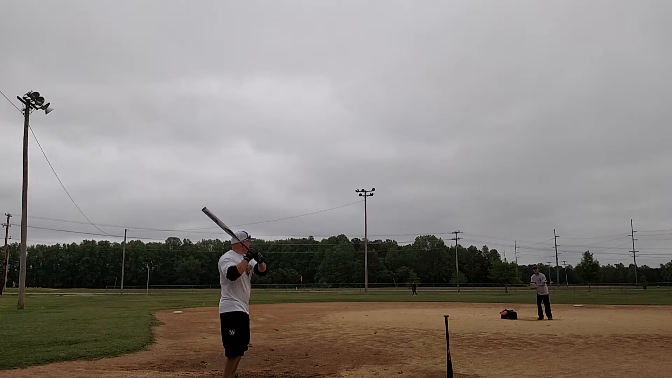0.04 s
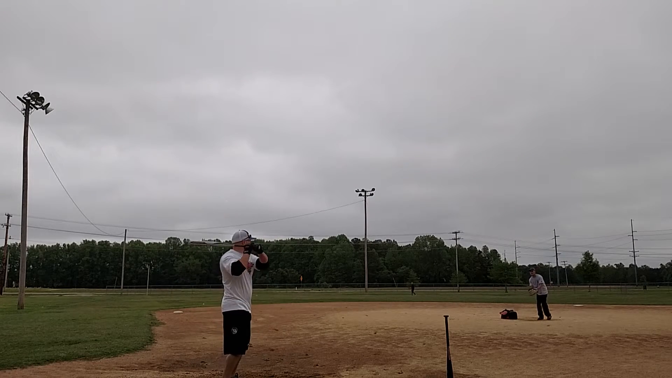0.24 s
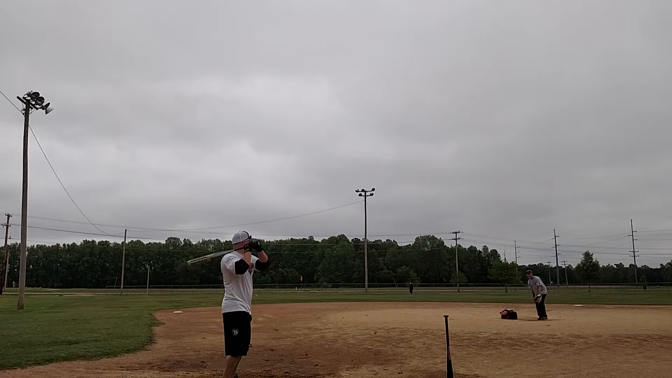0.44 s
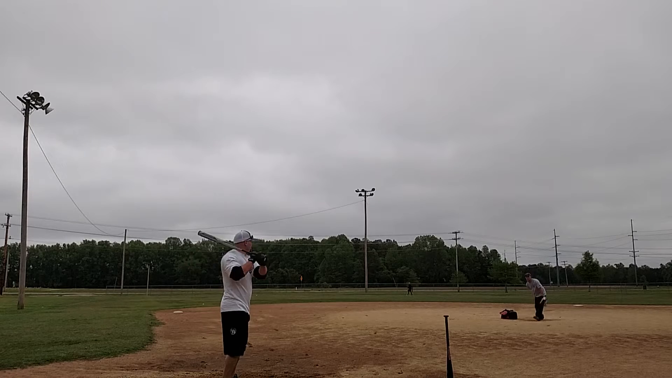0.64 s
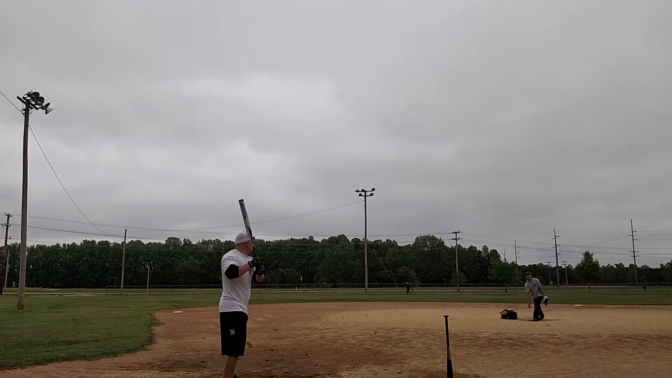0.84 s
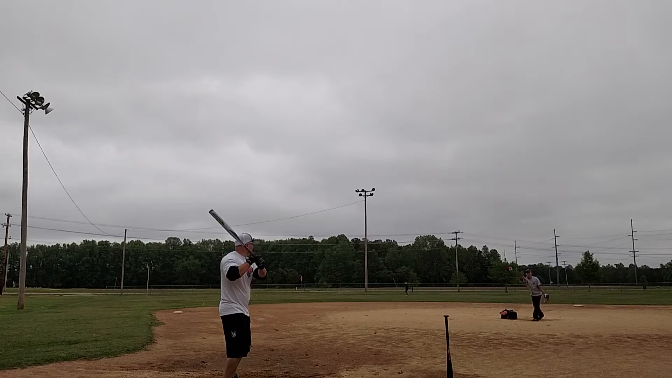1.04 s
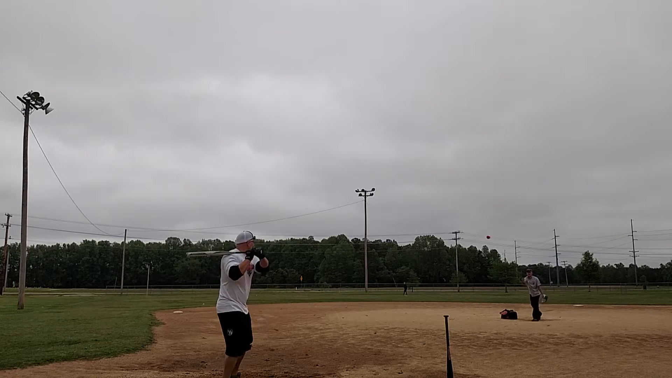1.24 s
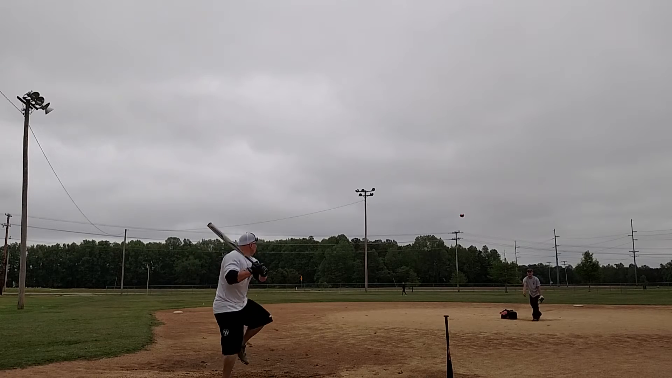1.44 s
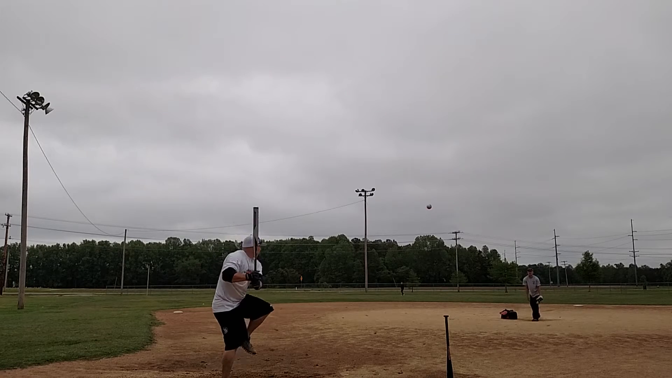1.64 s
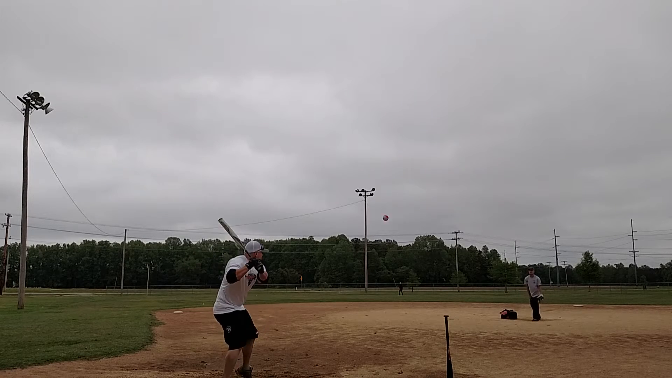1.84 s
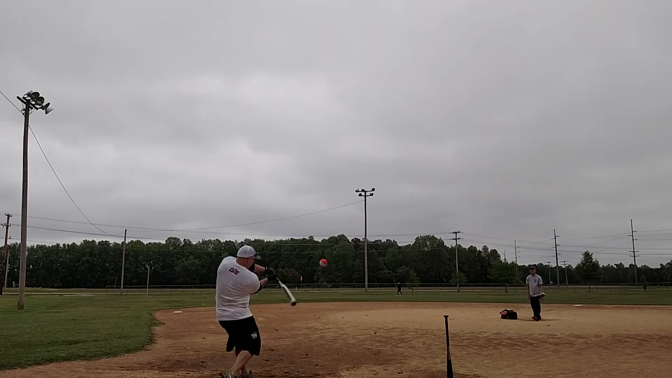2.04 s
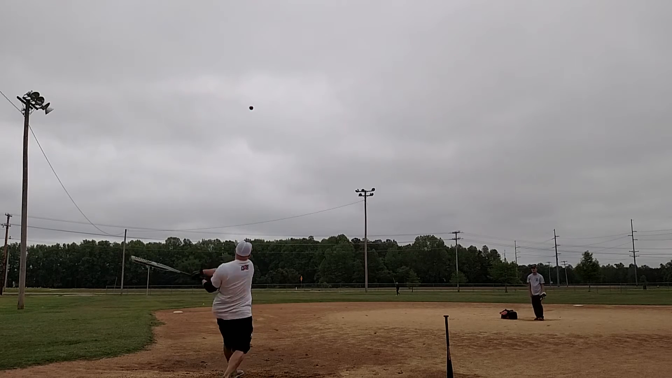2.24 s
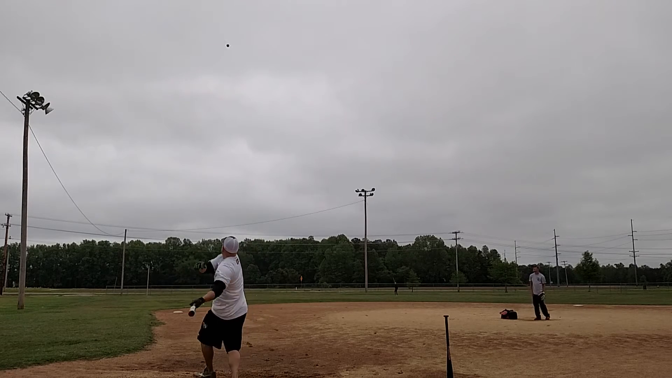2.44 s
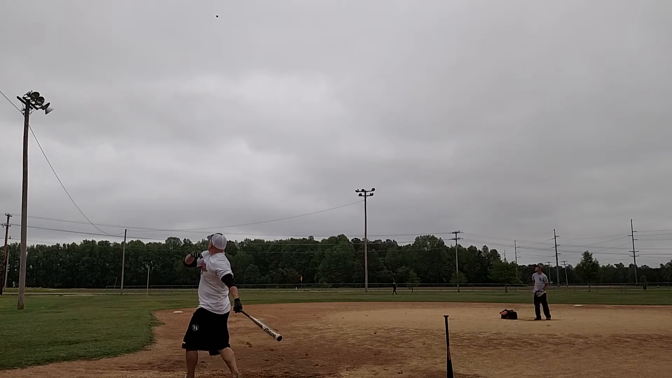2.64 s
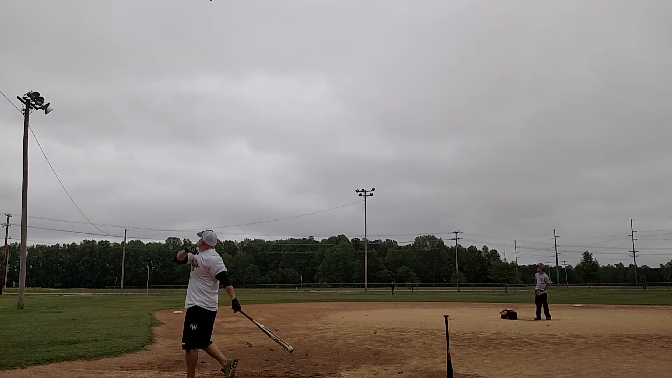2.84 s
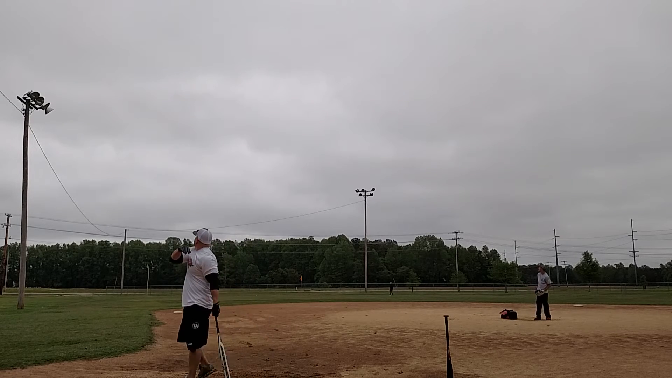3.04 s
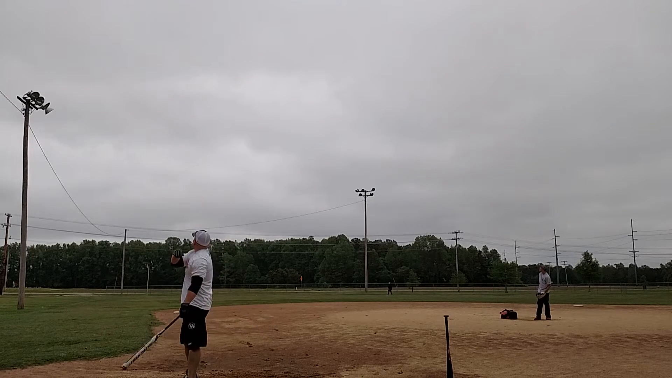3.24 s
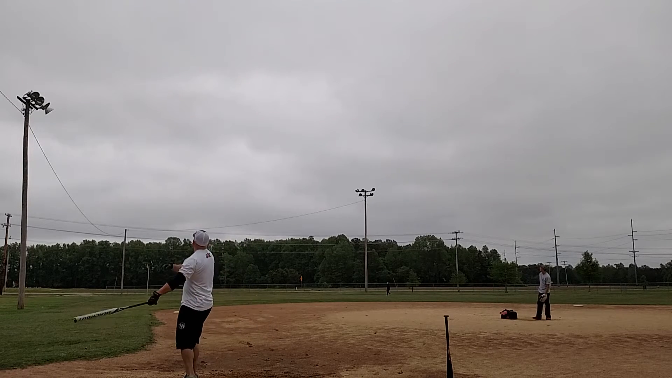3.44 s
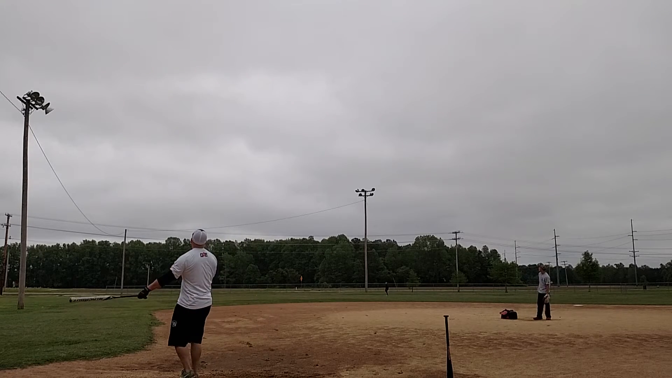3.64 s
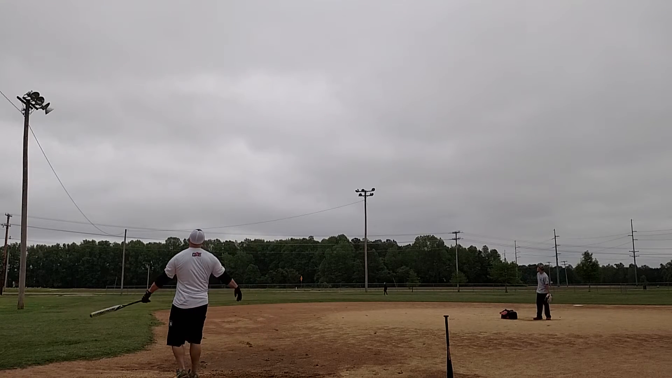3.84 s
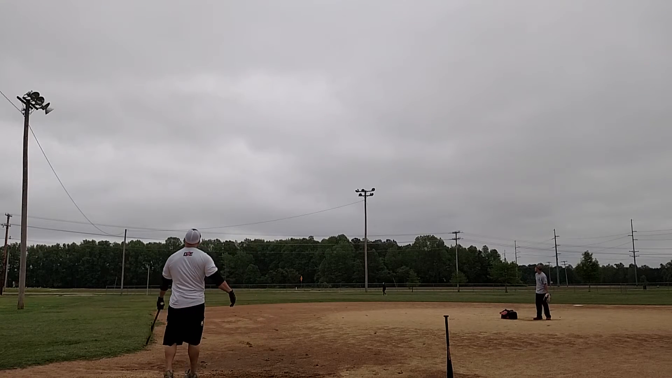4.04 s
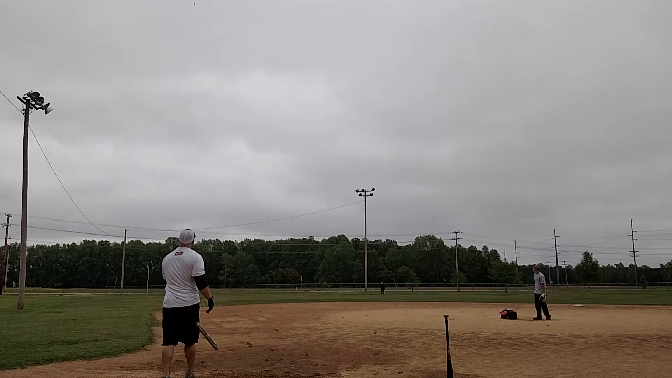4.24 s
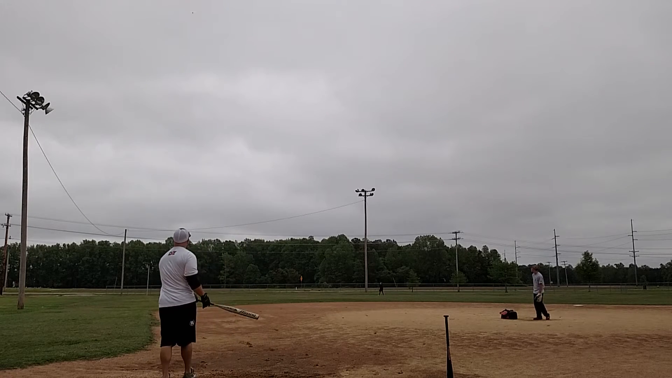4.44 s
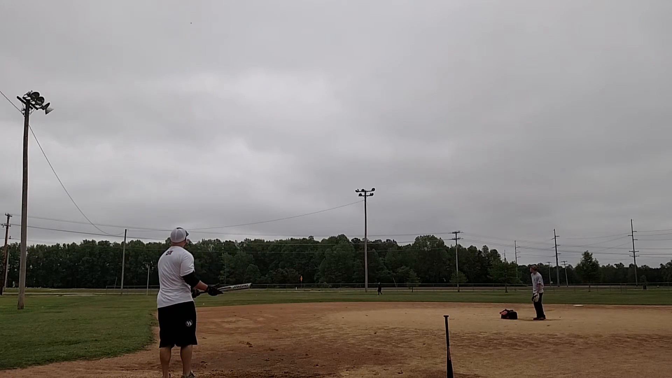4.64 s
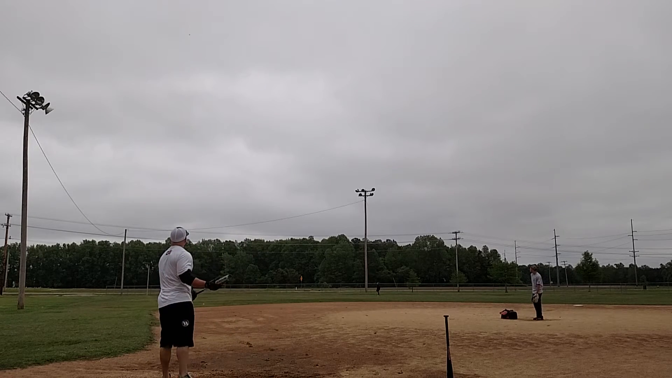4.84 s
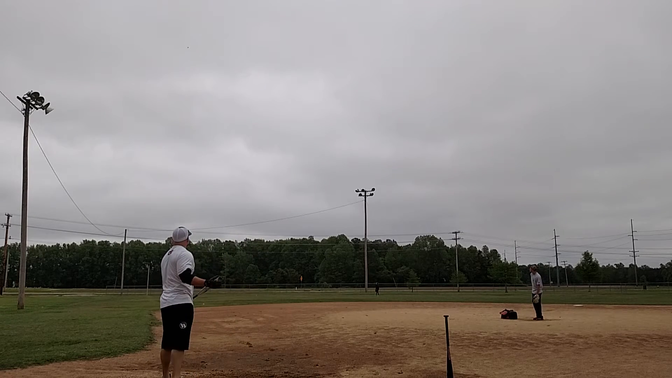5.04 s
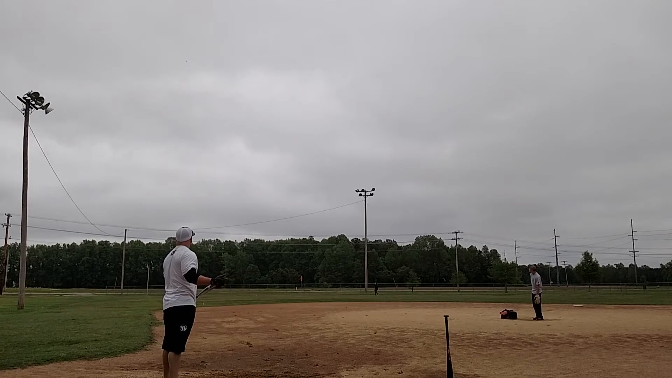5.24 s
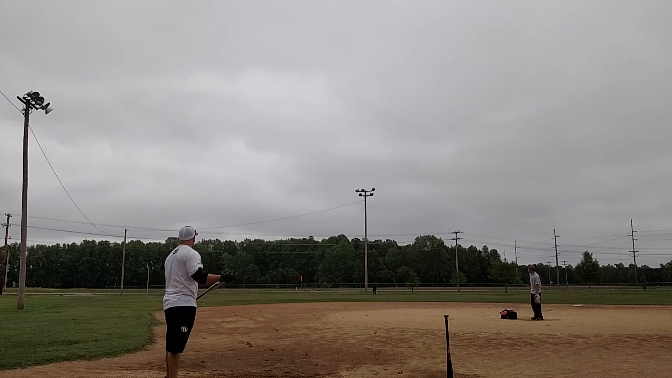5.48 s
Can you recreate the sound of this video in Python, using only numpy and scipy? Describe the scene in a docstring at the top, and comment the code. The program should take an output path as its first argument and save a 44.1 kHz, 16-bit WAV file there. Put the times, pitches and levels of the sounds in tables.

```python
"""An open dirt infield, the microphone a few steps from a batter who drives one pitched softball.
His shoes grind the dirt, the bat whooshes and cracks, and the ground, fences and a tree line answer.
Songbirds whistle and an insect buzzes over far traffic and leaves; a light breeze touches the microphone.
The crack overloads the recorder, whose gain dives and creeps back."""
import sys
import numpy as np
from scipy import signal
from scipy.fft import rfft, irfft
from scipy.io import wavfile

SR = 44100
rng = np.random.default_rng(int(sys.argv[2]) if len(sys.argv) > 2 else 0)


def to_wav(s):
    """Save 16-bit WAV."""
    ch = np.atleast_2d(s).T  # columns
    pcm = np.round(np.clip(ch, -1, 1) * 32767)  # PCM
    wavfile.write(sys.argv[1], SR, pcm.astype(np.int16))


N = 242991
TIME = np.arange(N) / SR
HIT_S = 2.2261

# Far traffic and leaves. Each row: frequency in Hz, relative level in dB.
TRAFFIC_SPECTRUM = [(12, -34), (20, -1.5), (44, -13), (109, 2.5), (232, 2.5), (393, -8.5), (439, -10),
                    (788, -16), (2150, -20.5), (2680, -21.5), (3170, -25.5), (6020, -34), (13900, -43.5),
                    (15500, -45.5)]
# Gusts on the microphone. Each row: centre in seconds, half width in seconds, level in dB.
GUSTS = [(.24, .05, -53), (.92, .18, -55), (1.98, .35, -53.5)]
# The birds' repertoire. Each entry: length in seconds, first, middle and last pitch in Hz, buzz from 0 to 1.
SYLLABLES = {"fall": (.112, 5800, 4480, 3550, .3), "rise": (.03, 1990, 2220, 2500, .1),
             "dip": (.03, 2010, 1790, 1590, 0.092), "flick": (.03, 3300, 2760, 2620, .1),
             "slur": (.048, 2920, 2810, 2100, .05), "arch": (0.14, 2480, 2735, 2680, .1),
             "coo": (.075, 1850, 2000, 2120, .08), "pip": (.04, 2700, 2700, 2700, .15),
             "hook": (.065, 4700, 5200, 5200, .25), "lisp": (.065, 6950, 6800, 6720, .55)}
# A bird repeats one syllable at an even pace.
# Each row: syllable, start, end and interval in seconds, first and last relative level in dB.
BOUTS = [("fall", .178, 1.4, .538, -68, -63), ("dip", .061, .7, .281, -63.5, -59.5),
         ("rise", .392, 1.2, .144, -62, -63), ("flick", .412, 1.05, .145, -70, -67),
         ("slur", 1.262, 2, .16, -61, -61.5), ("arch", 1.364, 1.9, .35, -63, -61),
         ("coo", 1.07, 1.7, .53, -70, -68), ("flick", 4.69, 5, .225, -66.5, -66.5),
         ("flick", 5.335, 5.5, .11, -65.5, -66)]
# Lone calls. Each row: syllable, start in seconds, middle pitch in Hz, relative level in dB.
CALLS = [("pip", .07, 2720, -64), ("rise", .163, 2450, -60), ("dip", .197, 2030, -63),
         ("pip", .618, 2700, -67), ("lisp", .7, 6700, -73), ("pip", .772, 2080, -62),
         ("pip", 1.152, 2690, -66), ("rise", 1.31, 2650, -66), ("hook", 1.55, 5200, -68),
         ("slur", 2.872, 2500, -67), ("slur", 3.09, 2950, -66.5), ("flick", 3.352, 3080, -59.5),
         ("lisp", 3.805, 7130, -70), ("pip", 3.828, 2890, -64), ("lisp", 3.98, 4970, -71.5),
         ("lisp", 4.35, 4920, -69), ("rise", 5.23, 2700, -68), ("pip", 5.27, 2120, -67),
         ("rise", 5.472, 2600, -61), ("dip", 5.485, 2470, -58)]
# Long buzzy whistles that sag at the end.
# Each row: start and length in seconds, pitch in Hz, share of pitch lost, relative level in dB.
TRILLS = [(-.08, .35, 3394, 0.011, -67), (1.4, 0.52, 3580, 0.031, -69), (1.7, 0.33, 3490, .15, -62),
          (3.548, 0.94, 3410, 0.0053, -70), (3.78, 0.35, 3380, 0.0305, -64.5), (4.2, .62, 3405, .06, -69.5),
          (4.904, 0.32, 3380, .11, -68)]
# Shoes on the dirt, close by. Each row: start and length in seconds, level in dB, tilt in dB per octave.
SCUFFS = [(.845, .044, -56, -3.5), (1.371, .062, -62.5, 12.5), (1.988, 0.092, -48, 1.6),
          (2.076, 0.066, -42.5, .5), (2.124, 0.18, -44, 1), (2.219, .083, -33.5, 0.5),
          (2.283, 0.052, -38.5, 2), (2.372, 0.067, -52, 6), (2.718, 0.046, -40, 0.7),
          (3.299, .058, -55, -1.5), (3.468, 0.087, -54.5, 1), (4.08, 0.43, -55.5, 1.7),
          (4.866, .041, -56.5, -2), (4.885, .32, -61.5, 9), (5.132, .23, -62, 3.5)]
# Dirt under a sliding sole. Each row: frequency in Hz, relative level in dB.
DIRT_SPECTRUM = [(240, -44), (400, -3.5), (972, -4), (1540, -2.5), (1690, -2), (2190, -5.5), (2630, -4.5),
                 (3210, -6), (5560, -14), (11100, -27), (15500, -32.5)]
# The sharpest stones that snap underfoot. Each row: start in seconds, level in dB.
STONES = [(2.267, -35), (2.296, -25.5), (2.344, -39), (3.628, -47.5), (4.664, -52), (5.163, -47),
          (5.344, -50)]
# Ringing of barrel and ball. Each row: frequency in Hz, relative level in dB, seconds to fall 60 dB.
BAT_MODES = [(362, -25, 0.015), (590, -15, 0.014), (742, -0.94, 0.0075), (1068, -10, 0.037),
             (1140, -7.5, 0.014), (1806, 2.5, 0.0082), (2110, -5, 0.0162), (2185, -12, 0.0138),
             (2500, -11.5, 0.0098), (3460, -7, 0.011), (4170, -30, 0.023), (4418, -14.5, 0.0098),
             (5070, -16.5, 0.0117), (5000, -14, 0.0159), (6340, -4.5, 0.0044), (6270, -13.5, 0.0113),
             (8020, -21, 0.0039), (8260, -23, 0.0083), (9100, -27.5, 0.0052), (10030, -13, 0.0044),
             (11700, -9.5, 0.0017)]
# The ground, fences and walls throw the crack back.
# Each row: delay in seconds, gain in dB, low-pass cutoff in Hz.
ECHOES = [(.0019, -19, 9012), (.0066, -26.5, 5920), (.0335, -42.5, 3000), (.054, -38, 1495),
          (.0935, -52, 3000), (.1675, -49.5, 4000), (0.177, -59, 7000)]
# Near scatter and tree-line echo. Each row: frequency in Hz, relative level in dB.
FIELD_SPECTRUM = [(150, -19), (500, -11), (1100, -4), (2000, -3), (3500, -10), (6000, -17.5),
                  (10000, -26.5), (15000, -32.5)]
# Faint far pings. Each row: start in seconds, pitch in Hz, level in dB.
PINGS = [(2.316, 1180, -27.5), (3.313, 1190, -46)]
# The insect's wingbeat. Each row: time in seconds, strokes per second.
WING_RATE = [(3.5, 33.1), (4.5, 32.8), (5, 32), (5.2, 30.4), (5.5, 31.3)]
# The recorder's steady hiss. Each row: frequency in Hz, relative level in dB.
HISS_SPECTRUM = [(100, -4), (500, 0.5), (1200, 3), (3000, -6.5), (7000, -13), (15000, -20.5)]


def amp(db):
    """Decibels to gain."""
    return 10 ** (np.asarray(db) / 20)


def unit(x):
    """Scales to rms 1."""
    return x / np.sqrt(np.mean(x ** 2) + 1e-20)


def add(mix, s, sound):
    """Mixes a sound in at s seconds."""
    at = round(s * SR)
    sound = sound[max(-at, 0):]
    part = mix[max(at, 0):][:len(sound)]
    part += sound[:len(part)]


def colour(x, points, tilt_db=0):
    """Filters by a (Hz, dB) spectrum, tilted per octave about 3 kHz."""
    octave = np.log2(np.fft.rfftfreq(len(x), 1 / SR) + 1)
    hz, db = np.transpose(points)
    slope = tilt_db * (octave - np.log2(3000))
    return irfft(rfft(x) * amp(np.interp(octave, np.log2(hz), db) + slope), len(x))


def band(x, hz, kind, order=2):
    """Causal low-, high- or band-pass."""
    return signal.sosfilt(signal.butter(order, hz, kind, fs=SR, output="sos"), x)


def noise(size, edges_hz, order=2):
    """A band of noise of rms 1."""
    return unit(band(rng.standard_normal(size), edges_hz, "band", order))


def wander(size, hz):
    """Random drift of rms 1, mostly slower than hz."""
    return unit(band(rng.standard_normal(size + SR // 10), hz, "low")[-size:])


def traffic_and_leaves(level_db=-51, swell_db=.22):
    """Far traffic and leaves blend into a wash that barely swells."""
    level = amp(level_db + swell_db * wander(N, 2.6))
    return level * unit(colour(rng.standard_normal(N), TRAFFIC_SPECTRUM))


def breeze(calm_db=-73, flutter_db=1.1, rumble_hz=(20, 85)):
    """Light wind rumbles on the microphone, rising in gusts."""
    gusts = sum(amp(db) * np.exp(-((TIME - s) / width) ** 2) for s, width, db in GUSTS)
    return (amp(calm_db) + gusts) * amp(flutter_db * wander(N, 9)) * noise(N, rumble_hz)


def whistle(hz, buzz):
    """A bird's tone follows a pitch glide, fuller where it is low; buzz blurs it and softens its ends."""
    hz = hz * (1 + .005 * wander(len(hz), 120))
    blur = (wander(len(hz), 75) + 1j * wander(len(hz), 75)) / np.sqrt(2)
    tone = ((1 - buzz + buzz * blur) * np.exp(2j * np.pi * np.cumsum(hz) / SR)).real
    return unit(tone * amp(-hz / 130)) * signal.windows.tukey(len(hz), .3 + .5 * buzz)


def sing(name, pitch_hz=None):
    """One syllable of the repertoire, at its own pitch or transposed."""
    length, first, middle, last, buzz = SYLLABLES[name]
    progress = np.linspace(0, 1, int(length * SR))
    glide = np.polyval(np.polyfit([0, .5, 1], [first, middle, last], 2), progress)
    return whistle(glide * (pitch_hz or middle) / middle, buzz)


def birds(near_gain_db=2, chorus_db=-70, chorus_count=55, woods_db=-7, woods_t60=.5):
    """Near songbirds sing bouts, calls and trills over a faint far chorus; the woods add a short tail."""
    song = np.zeros(N)
    for name, start, end, interval, first_db, last_db in BOUTS:
        times = np.arange(start, end, interval)
        for s, db in zip(times, np.linspace(first_db, last_db, len(times))):
            add(song, s, amp(db + near_gain_db) * sing(name))
    for name, s, hz, db in CALLS:
        add(song, s, amp(db + near_gain_db) * sing(name, hz))
    for s, length, hz, sag, db in TRILLS:
        progress = np.linspace(0, 1, int(length * SR))
        add(song, s, amp(db + near_gain_db) * whistle(hz * (1 - sag * progress ** 2), buzz=.8))
    far = ["rise", "flick", "slur", "pip", "coo"]
    for k, (when, height) in enumerate(rng.random((chorus_count, 2))):
        call = sing(far[k % len(far)], pitch_hz=1950 + 1300 * height)
        add(song, (k + when) / chorus_count * N / SR, amp(chorus_db) * call)
    t = np.arange(SR // 2) / SR
    tail = rng.standard_normal(len(t)) * amp(-60 * t / woods_t60)
    return song + amp(woods_db) * signal.fftconvolve(song, tail / np.linalg.norm(tail))[:N]


def shoes(grains_per_s=5000, spread_db=.5, stone_t60=.012, stroll_s=3, grit_per_s=4, grit_db=-52.5):
    """A few steps off, soles slide over sand and snap stones; grit ticks once the batter strolls about."""
    out = np.zeros(N)
    for s, length, db, tilt_db in SCUFFS:
        size = int(length * SR)
        grains = rng.standard_normal(size) * amp(spread_db * np.minimum(rng.exponential(1, size), 4))
        grains *= rng.random(size) < grains_per_s / SR
        sand = unit(grains) + rng.standard_normal(size)  # coarse grains ride on the hiss of fine dust
        add(out, s, amp(db) * unit(colour(sand, DIRT_SPECTRUM, tilt_db)) * signal.windows.cosine(size))
    t = np.arange(SR // 40) / SR
    grit = [(stroll_s + (k + when) / grit_per_s, grit_db + 4 * (force - .5))
            for k, (when, force) in enumerate(rng.random((20, 2)))]
    for s, db in STONES + grit:
        add(out, s, amp(db - 60 * t / stone_t60) * noise(len(t), [3400, 6200]))
    return out


def thump(centre_s=.989, level_db=-30, width_s=.0034):
    """One soft, low pulse at the microphone."""
    offset = (TIME - centre_s) / width_s
    return amp(level_db) * (1 - offset ** 2) * np.exp(-offset ** 2 / 2)


def whoosh(level_db=-42, length_s=.035, first_hz=130, last_hz=240):
    """Eddies shed by the bat rise in pitch as it speeds toward the ball."""
    t = np.arange(0, length_s, 1 / SR)
    hz = np.linspace(first_hz, last_hz, len(t)) * (1 + .08 * wander(len(t), 150))
    eddies = np.sin(2 * np.pi * np.cumsum(hz) / SR) * np.hanning(len(t))
    out = np.zeros(N)
    add(out, HIT_S - .85 * length_s, amp(level_db) * unit(eddies))
    return out


def crack(gain_db=16.5, contact_s=.00015, rattle_db=-30, rattle_t60=.06):
    """The ball squashes on the barrel: modes of alternating sign build up, and the shell rattles."""
    t = np.arange(SR // 5) / SR
    modes = sum(-(-1) ** k * amp(db - 60 * t / t60) * np.sin(2 * np.pi * hz * t)
                for k, (hz, db, t60) in enumerate(BAT_MODES))
    rattle = noise(len(t), [700, 6000], order=1) * amp(rattle_db - 60 * t / rattle_t60)
    out = np.zeros(N)
    add(out, HIT_S, amp(gain_db) * (modes + rattle) * (1 - np.exp(-t / contact_s)))
    return out


def field_echoes(hit, near_db=-33, near_t60=.2, trees_db=-43, trees_t60=1.4):
    """Near surfaces return single echoes and a short scatter; a soft wash follows from the far trees."""
    out = np.zeros(N)
    for delay, db, top_hz in ECHOES:
        add(out, delay, amp(db) * band(hit, top_hz, "low"))
    t = np.arange(2 * SR) / SR
    near = amp(near_db - 60 * t / near_t60)
    trees = np.interp(t, [.07, .19], [0, 1]) * amp(trees_db - 60 * (t - .18) / trees_t60)
    add(out, HIT_S, (near + trees) * unit(colour(rng.standard_normal(len(t)), FIELD_SPECTRUM)))
    return out


def pings(t60=.075, rise_s=.0025):
    """Two faint far pings, likely the bat's ring echoing back."""
    out, t = np.zeros(N), np.arange(SR // 5) / SR
    for s, hz, db in PINGS:
        add(out, s, amp(db - 60 * t / t60) * (1 - np.exp(-t / rise_s)) * np.sin(2 * np.pi * hz * t))
    return out


def insect(start_s=3.46, rise_s=.67, level_db=-66, band_hz=(6150, 7400), chirp_db=-1):
    """A dry buzz in the grass swells, then holds: each wing stroke is a tiny rising chirp over a rasp."""
    strokes_per_s = np.interp(TIME, *np.transpose(WING_RATE))
    phase = np.cumsum(strokes_per_s) / SR % 1 - .5
    stroke = np.exp(-(phase / .08) ** 2)
    hz = np.interp(phase, [-.09, .09], band_hz) * (1 + .015 * wander(N, 300))
    chirps = stroke * np.sin(2 * np.pi * np.cumsum(hz) / SR)
    buzz = unit(noise(N, band_hz) + amp(chirp_db) * unit(chirps))
    return buzz * amp(level_db) * np.clip((TIME - start_s) / rise_s, 0, 1)


def scene():
    """At one microphone: the batter's swing and feet, the hit's echoes and far pings, and the open air."""
    hit = crack()
    batting = hit + field_echoes(hit) + whoosh() + shoes() + pings()
    surroundings = birds() + insect() + traffic_and_leaves() + breeze() + thump()
    return (batting + surroundings)[None]


def record(dry, threshold_db=-8, max_cut_db=16, recover_db_per_s=9.5, attack_s=.00012, hiss_db=-68):
    """The recorder's gain dives at a loud peak and creeps back; overshoots clip, and hiss lies beneath."""
    over_db = np.clip(20 * np.log10(abs(dry[0]) + 1e-9) - threshold_db, 0, max_cut_db)
    recovery_db = TIME * recover_db_per_s
    held_db = np.maximum.accumulate(over_db + recovery_db) - recovery_db
    pole = np.exp(-1 / (attack_s * SR))
    cut_db = signal.lfilter([1 - pole], [1, -pole], held_db)
    clipped = np.clip(dry / amp(cut_db), -1, 1)
    hiss = amp(hiss_db) * unit(colour(rng.standard_normal(N), HISS_SPECTRUM))
    low_pass = signal.firwin(301, cutoff=15700, window=("kaiser", 8), fs=SR)
    return signal.oaconvolve(clipped + hiss, low_pass[None], "same")


dry = scene()
out = record(dry)
to_wav(out)
```